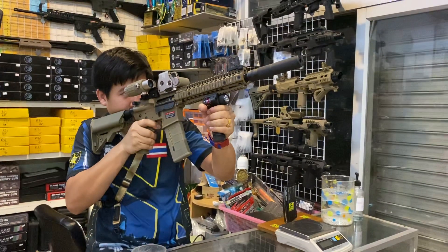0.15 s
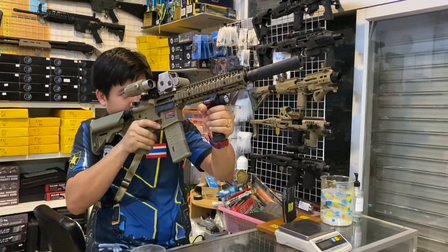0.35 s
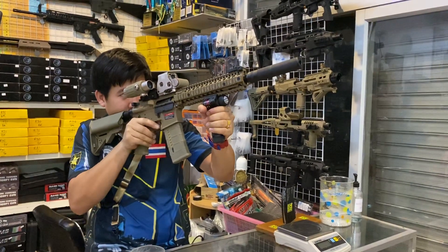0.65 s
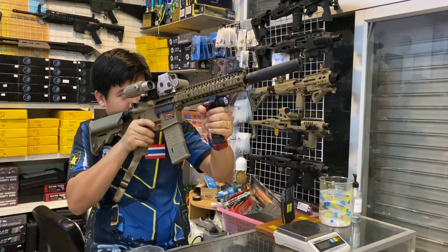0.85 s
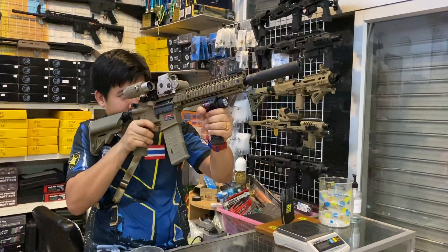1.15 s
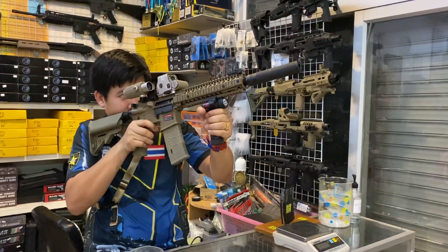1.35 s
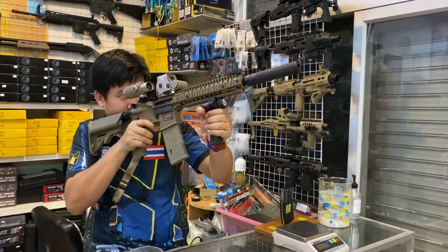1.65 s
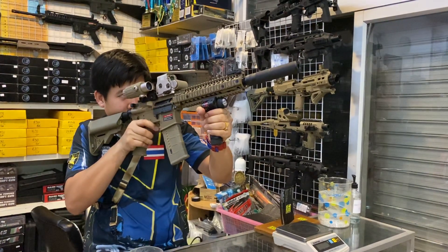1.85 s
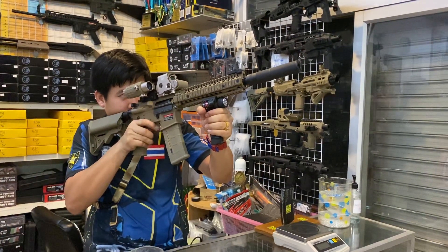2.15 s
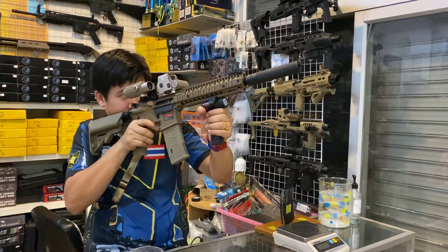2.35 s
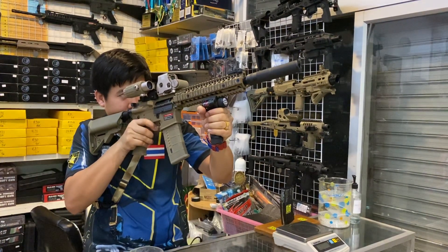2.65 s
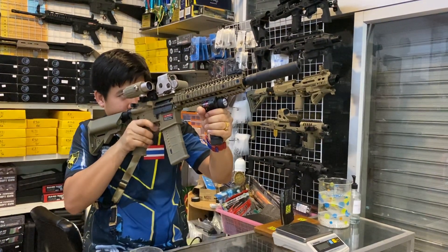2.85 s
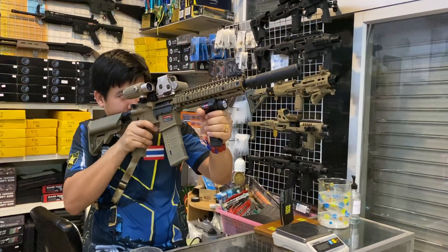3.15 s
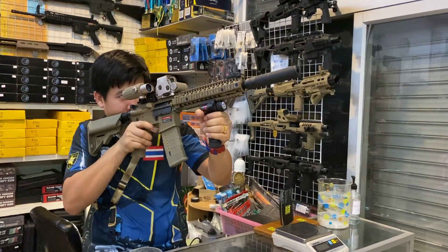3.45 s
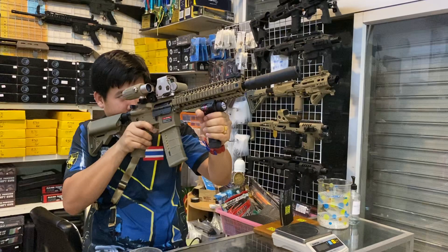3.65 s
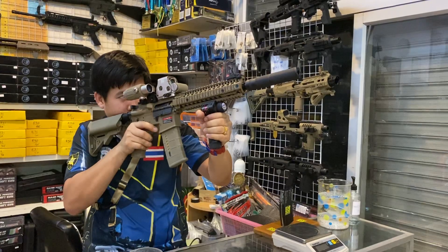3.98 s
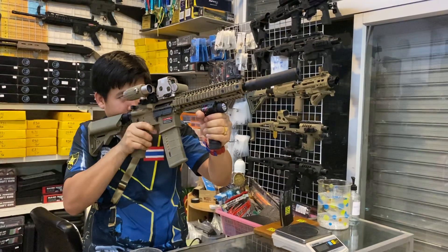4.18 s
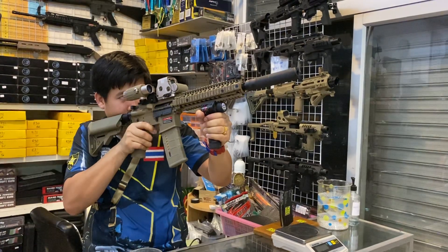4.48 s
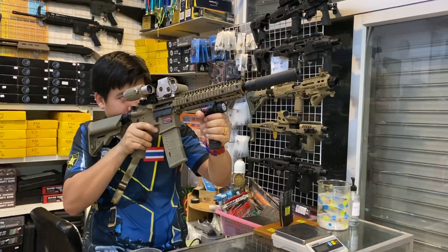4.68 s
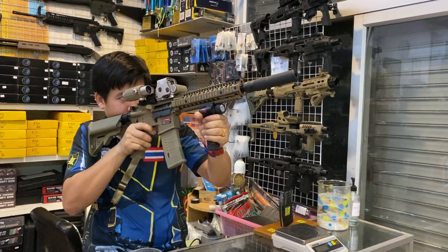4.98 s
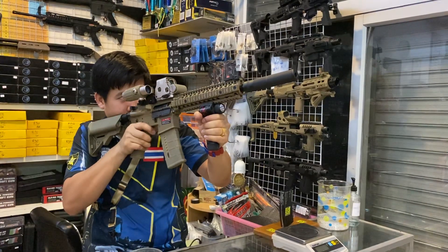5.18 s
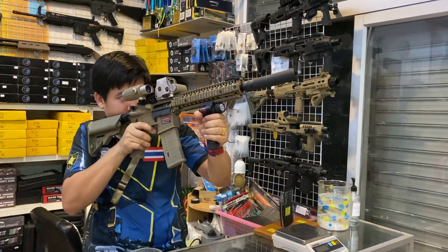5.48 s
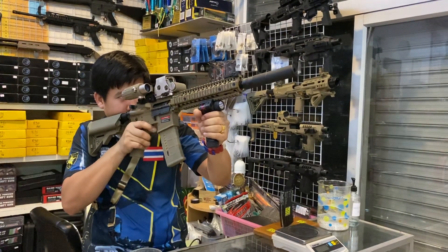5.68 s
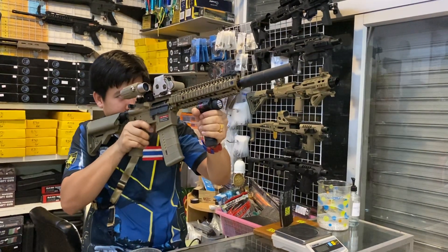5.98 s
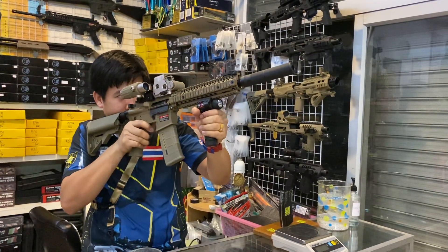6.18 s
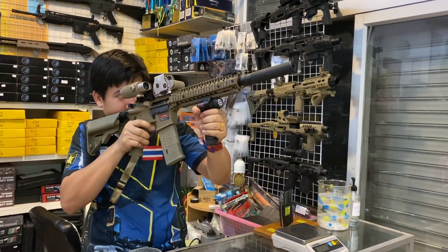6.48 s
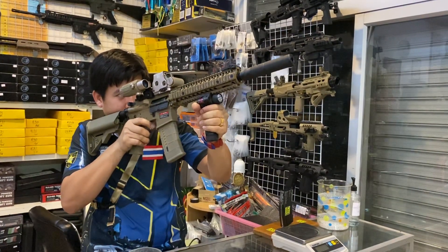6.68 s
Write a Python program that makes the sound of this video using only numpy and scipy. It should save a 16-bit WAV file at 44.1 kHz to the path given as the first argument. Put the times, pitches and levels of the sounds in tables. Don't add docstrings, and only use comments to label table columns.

```python
import sys
import numpy as np
from scipy import signal
from scipy.fft import rfft, irfft, next_fast_len
from scipy.io import wavfile
from scipy.ndimage import uniform_filter1d

SR = 44100
rng = np.random.default_rng(int(sys.argv[2]) if len(sys.argv) > 2 else 0)


def decibels_to_gain(level_db):
    exponent = np.asarray(level_db, float) / 20
    return 10 ** exponent


def master(y):
    cut = np.clip(np.atleast_2d(y).T, -1, 1)
    pcm = np.round(cut * 32767)
    wavfile.write(sys.argv[1], SR, pcm.astype(np.int16))


N = 301203


def evened(x):
    return x / np.sqrt(np.mean(x ** 2) + 1e-20)


def read(points, hz):
    f, value = np.transpose(points)
    return np.interp(np.log(hz + 1), np.log(f + 1), value)


def add(mix, s, sound):
    part = mix[max(round(s * SR), 0):][:len(sound)]
    part += sound[:len(part)]


def hiss(shape, count):
    spectrum = rfft(rng.standard_normal(count))
    gain = decibels_to_gain(read(shape, np.fft.rfftfreq(count, 1 / SR)))
    return evened(irfft(spectrum * gain, count))


def puff(shape, t, decay_s):
    fade = np.exp(-t / decay_s)
    burst = hiss(shape, len(t)) * fade
    return burst * np.linalg.norm(fade) / np.linalg.norm(burst)


def resonate(x, hz, width):
    pole = np.exp((2j * np.pi * hz - np.pi * width) / SR)
    return 2 * signal.lfilter([1 - abs(pole)], [1, -pole], x).real


def ring(modes, t, detune, rise_s):
    tones = sum(decibels_to_gain(db - 60 * t / t60) * np.sin(2 * np.pi * hz * detune * t) for hz, db, t60 in modes)
    return tones * (1 - np.exp(-t / rise_s))


# (frequency [Hz], level [dB per Hz])
ROOM_TONE = [(47, -34), (80, 0.5), (93, 9.5), (190, 0.5), (601, -16), (5770, -34), (8050, -58), (8790, -62),
             (16000, -45.5)]


def room_tone():
    return decibels_to_gain(-64.5) * np.array([hiss(ROOM_TONE, N), hiss(ROOM_TONE, N)])


# (piston lands [s], wind-up before it [s], knock [dB], crack [dB], pellet smack [dB])
SINGLES = [(0.9194, .060, -9.3, -10.6, -19), (1.1445, .0555, -13.0, -10.5, -19),
           (1.3621, .053, -10.1, -16.5, -25), (1.5542, .058, -10.0, -11.0, -19),
           (1.7451, .052, -11.5, -10.6, -20), (1.9288, .059, -9.2, -10.0, -20),
           (2.1173, .057, -12.3, -12.2, -23), (2.2991, .051, -10.6, -9.6, -23),
           (2.4893, .057, -9.4, -13.8, -23), (2.6759, .058, -8.1, -11.6, -22),
           (2.8614, .053, -10.1, -13.3, -21), (3.0552, .060, -9.0, -10.5, -19),
           (3.2353, .059, -10.6, -11.4, -13), (3.4258, .057, -9.8, -13.2, -12),
           (3.5976, .054, -10.0, -15.1, -17)]
# (first shot [s], shots [count], cycle [s], spin-up lag on the first cycle [s],
# braking lag on the last [s])
BURSTS = [
    (0.0074, 7, .04662, 0, .0034),
    (4.2303, 9, .04845, .00655, .0003),
    (5.0321, 11, .04873, .00927, .0066),
    (5.9539, 11, .04916, .00524, .0018),
    (6.85, 1, .049, 0, 0),
]
# (wind-up [s], gear [dB], knock [dB], crack [dB], thump [dB])
EFFORT = [
    (0.18, -27.5, -11, -11, -25.5),
    (.062, -26, -12, -10, -24.6),
    (.045, -28.5, -12.5, -11, -26.5),
    (0.068, -30, -12.5, -10.5, -27.5),
    (0.068, -31.5, -12, -11, -26),
]


def firing():
    rows = [(s, knock, crack, -21.7, smack) for s, _, knock, crack, smack in SINGLES]
    pulls = [(s - wind, s + 0.027, -24.5, -13.5) for s, wind, *_ in SINGLES]
    for burst, effort in zip(BURSTS, EFFORT):
        first, count, cycle, spin, brake = burst
        wind, gear_db, knock_db, crack_db, thump_db = effort
        k = np.arange(count)
        last = k == count - 1
        lag = spin * ((k > 0) + 0.13 * (k > 1))
        s = first + k * cycle + lag + brake * last
        a, b, c = np.clip(rng.standard_normal((count, 3)), -2, 2).T
        fresh = np.exp(-k / 1.2)
        knock = knock_db + 1.93 * a
        crack = crack_db + 2.7 * b - 1.5 * last
        thump = thump_db + 3.5 * fresh ** 2
        smack = -23 + 10.5 * fresh * (spin > 0) + 2.2 * c - 14.5 * last
        rows += zip(s, knock, crack, thump, smack)
        pulls.append((first - wind, s[-1] + 0.016, gear_db, -12))
    return sorted(rows), sorted(pulls)


# (frequency [Hz], width [Hz], level [dB])
GEARBOX = [(1865, 110, -4), (2470, 110, -10.5), (2850, 110, -14), (4838, 450, -13.5)]
# (frequency [Hz], level [dB per Hz])
GRIND = [(150, -26.5), (480, -16.5), (700, 4.5), (1400, 0), (2500, 0.5), (4800, -3.5), (8000, -2),
         (10500, 0), (13800, -11), (14900, -42), (16500, -60)]
# (frequency [Hz], width [Hz])
PINION = (885, 160)


def motor(pulls):
    t = np.arange(N) / SR
    level, early, whine, speed, bites = np.zeros((5, N))
    for on, off, db, whine_db in pulls:
        age = np.maximum(t - on, 0)
        run = decibels_to_gain(db) * (t > on) * np.exp(-np.maximum(t - off, 0) / 0.032)
        level += run * (0.041 + (1 - np.exp(-age / 0.032)) ** 2)
        early += run * (1 - np.exp(-age / 0.012))
        whine = np.where(t > on, decibels_to_gain(whine_db), whine)
        speed = np.where(t > on, 1 - np.exp(-(age + 0.016) / 0.027), speed)
        if on > 0:
            add(bites, on + 0.005, decibels_to_gain(db - 9.5) * puff(GRIND, t[:2000], 0.0075))

    wobble = 1 + 0.07 * uniform_filter1d(rng.standard_normal(N), 150)
    turns = np.cumsum(1080 * speed * wobble) / SR
    teeth = np.diff(np.floor(turns), prepend=0) * (1 + 0.2 * rng.standard_normal(N))
    tone = decibels_to_gain(37) * resonate(resonate(teeth, *PINION), *PINION)
    octave_hz = 2 * PINION[0]
    tone += decibels_to_gain(24.5) * resonate(resonate(teeth, octave_hz, 300), octave_hz, 300)

    chatter = decibels_to_gain(4.258 * evened(uniform_filter1d(rng.standard_normal(N), 60)))
    grind = evened(hiss(GRIND, N) * chatter)
    drive = 0.85 * evened(teeth - teeth.mean()) + rng.standard_normal(N)
    shell = evened(sum(decibels_to_gain(db) * resonate(drive, hz, width) for hz, width, db in GEARBOX))
    return level * (grind + whine * tone) + decibels_to_gain(4) * early * whine * shell + bites


# (frequency [Hz], level [dB], t60 [s])
KNOCK = [(1280, 0, .009), (680, -14, .03), (850, -12, .014)]
# (frequency [Hz], level [dB], t60 [s])
TUBE = [(1200, -3.5, .021), (1390, -4.5, .024), (1025, -9, .04), (3900, -16, .012)]
# (frequency [Hz], level [dB], t60 [s])
THUMP = [(190.5, -1.5, 0.043), (150.2, 0.5, 0.029), (132, -2, 0.07), (276, -15.5, 0.11), (328, -20, 0.21),
         (521, -18.5, 0.21)]
# (frequency [Hz], level [dB], t60 [s])
BOOM = [(57.4, -15.5, 0.067), (82, -4.5, 0.07)]
# (frequency [Hz], level [dB])
CRACK = [(900, -37.5), (2200, -0.5), (3500, 1), (4900, 5.5), (8000, -4), (11000, 1), (13800, 1),
         (14900, -14.5), (16500, -38)]
# (frequency [Hz], level [dB])
SMACK = [(400, -62), (1200, -6), (2500, -5.5), (5500, -1), (8000, -3), (11000, -3), (13800, -8),
         (14900, -22.5), (16500, -36.5)]


def shots(fired):
    tube_s, thump_s, flight_s = 0.00515, 0.0043, 0.0207
    out, air, knocks = np.zeros((3, N))
    t = np.arange(6000) / SR
    chance = rng.standard_normal((len(fired), 4))
    spike = np.sinc((t - 0.0003) * 24000) - 0.3 * np.sinc((t - 0.0003) * 5400)
    for (s, knock_db, crack_db, thump_db, smack_db), (a, b, c, d) in zip(fired, chance):
        add(knocks, s - 0.00016, decibels_to_gain(knock_db + 3) * ring(KNOCK, t, 1 + 0.02 * a, 0.00008))
        add(out, s - 0.0003, decibels_to_gain(crack_db + 0.5) * spike)
        add(out, s - 0.0001, decibels_to_gain(crack_db + 3) * puff(CRACK, t, 0.0006))
        add(out, s + tube_s, -decibels_to_gain(knock_db - 1 + b) * ring(TUBE, t, 1 + 0.006 * c, 0.0004))
        add(out, s + tube_s, decibels_to_gain(crack_db - 11 + c) * puff(CRACK, t, 0.006))
        add(air, s + thump_s, -decibels_to_gain(thump_db + 5) * ring(THUMP, t, 1 + 0.005 * d, 0.0008))
        boom_db = thump_db - 34.5 + 5.2 * a
        add(out, s + thump_s, decibels_to_gain(boom_db) * ring(BOOM, t, 1 + 0.064 * b, 0.0098))
        add(out, s + flight_s, decibels_to_gain(smack_db + 0.7) * puff(SMACK, t, 0.0059))

    small = signal.butter(2, 105, "high", fs=SR, output="sos")
    thin = signal.butter(2, 480, "high", fs=SR, output="sos")
    null = signal.iirnotch(99, 3.0, SR)
    air = signal.lfilter(*null, signal.sosfilt(small, air))
    return out + air + decibels_to_gain(-1.13) * signal.sosfilt(thin, knocks)


# (frequency [Hz], t60 [s])
SHOP = [(60, 0.19), (150, 0.26), (400, 0.2474), (1500, 0.33), (5000, 0.26), (13000, 0.22)]
# (frequency [Hz], level [dB])
WET = [(60, -1.5), (200, -2.5), (480, 11), (800, 2), (2000, 6), (6000, 5), (13500, 2.5), (14800, -1.5),
       (16000, -27)]
# (left delay [s], right delay [s], level [dB])
EARLY = [
    (.0023, 0.0024, -9),
    (.0094, 0.0053, -22.5),
    (0.0162, 0.0135, -29.5),
    (0.0187, 0.014, -51),
    (0.0237, 0.0182, -18.5),
]


def shop(x):
    taps = np.zeros((6, SR))
    at = np.arange(400, SR - 20, 20) + rng.integers(0, 20, (6, (SR - 401) // 20))
    np.put_along_axis(taps, at, rng.choice([-1., 1.], at.shape), 1)
    hz, t, z = signal.stft(taps, SR, nperseg=512)
    fall_db = -60 * t / read(SHOP, hz)[:, None]
    z = z * np.hypot(decibels_to_gain(fall_db), decibels_to_gain(-5 + fall_db / 1.716))
    z = z / np.sqrt((abs(z) ** 2).sum(2, keepdims=True)) * decibels_to_gain(read(WET, hz)[:, None])
    tail = signal.istft(z, SR, nperseg=512)[1]
    tail = decibels_to_gain(-8.0) * tail / np.linalg.norm(tail[0])

    phase = 2 * np.pi * (2.3 * np.arange(N) / SR + np.arange(3)[:, None] / 3)
    steady = signal.butter(2, 1600, fs=SR, output="sos")
    low = signal.sosfiltfilt(steady, x)
    turns = np.sqrt(2 / 3) * np.cos(phase) * (x - low) + low * [[1], [0], [0]]
    turns = np.repeat(turns, 2, axis=0)
    out = signal.fftconvolve(turns, tail, axes=1)[:, :N].reshape(3, 2, N).sum(0)

    dull = uniform_filter1d(x, 5) - uniform_filter1d(x, 100)
    for left_s, right_s, db in EARLY:
        add(out[0], left_s, decibels_to_gain(db) * dull)
        add(out[1], right_s, decibels_to_gain(db) * dull)
    return out


# (time [s], level [dB])
DRONE = [
    (0, -58),
    (3.5, -65.5),
    (4.0, -63),
    (4.8, -53.5),
    (5.4, -65.5),
    (6.83, -73.5),
]


def rumble(fired):
    shake_db, scatter_db, t60_s, rise_s = -41, 2.5, 0.18, 0.01
    t, power = np.arange(SR // 2) / SR, np.zeros(N)
    for (s, *_), a in zip(fired, rng.standard_normal(len(fired))):
        fall = decibels_to_gain(2 * (shake_db + scatter_db * a - 60 * t / t60_s))
        add(power, s, fall * (1 - np.exp(-t / rise_s)))
    heave = hiss([(30, -21), (45, -1.5), (62, 6.0), (84, -4.5), (100, -36.5)], N)
    shape = [(25, -28.5), (40, -9.0), (48, 1.5), (60, -14.0), (95, -53)]
    drone = np.array([hiss(shape, N), hiss(shape, N)])
    drone_db = np.interp(np.arange(N) / SR, *np.transpose(DRONE))
    return np.sqrt(power) * heave + decibels_to_gain(drone_db) * drone


# (time [s], peak level [dB], treble [dB], ring t60 [s])
TICKS = [
    (0.5564, -50, 6.5, 0.031),
    (0.5896, -53, 8, 0.078),
    (0.654, -49.5, 13.5, 0.11),
    (0.727, -53, -22, 0.069),
    (0.7698, -60.5, -5, 0.18),
    (3.9471, -32.5, 13, 0.018),
    (4.127, -86, -36.5, 0.11),
    (6.638, -52, -17, 0.083),
    (6.7506, -65, 9, 0.0316),
]
# (time [s], level [dB])
STIR = [
    [(0.5, -56), (0.588, -54), (0.622, -60.5), (0.746, -54), (0.842, -64.5), (0.85, -88)],
    [(6.62, -78), (6.646, -74), (6.726, -87.5), (6.77, -50.5), (6.775, -82)],
]


def handling():
    out, t = np.zeros(N), np.arange(6000) / SR
    for s, db, treble_db, t60 in TICKS:
        top_db = 2 * treble_db
        shape = [(600, -2.5), (1500, 11.5), (4000, 19), (8000, top_db), (13000, top_db - 3.5)]
        add(out, s, decibels_to_gain(db + 0.5 - 60 * t / max(t60, 0.01)) * hiss(shape, len(t)))
    for rows in STIR:
        s, db = np.transpose(rows)
        t = np.arange(s[0], s[-1], 1 / SR)
        cloth = hiss([(200, 8.5), (700, 15.5), (2500, 13), (6000, -50.0), (12000, -41)], len(t))
        level = decibels_to_gain(np.interp(t, s, db) - 5.5)
        add(out, s[0], level * cloth * signal.windows.tukey(len(t), 0.2))
    return out


# (frequency [Hz], likeness [0-1])
SAME = [(30, 0.6), (70, 0.71), (150, 1), (300, 0.06), (600, 0.09), (1500, 0.14), (5000, 0.17), (7500, 0.4),
        (15000, 0.9998)]
# (frequency [Hz], lead [radians])
LEAD = [(0, 0), (1380, 1.08), (3010, 0.5), (6800, 1.2), (8100, -2), (9730, -7), (10700, -7.5),
        (12700, -10.5), (13400, -12), (14600, -11), (15300, -19.5), (16100, -20.5)]
# (frequency [Hz], left minus right [dB])
TILT = [(60, 0), (600, -1), (1200, -1), (2400, 2), (5500, 4.5), (7800, 0.42), (15000, -1)]


def ports(direct, far):
    size = next_fast_len(N)
    hz = np.fft.rfftfreq(size, 1 / SR)
    same = np.clip(read(SAME, hz), 0, 1)
    half_db = read(TILT, hz) / 2
    near, (a, b) = rfft(direct, size), rfft(far, size)
    left = (near + a) * decibels_to_gain(half_db)
    right = (near + same * a + np.sqrt(1 - same ** 2) * b) * decibels_to_gain(-half_db)
    right = right * np.exp(-1j * np.interp(hz, *np.transpose(LEAD)))
    return irfft(np.array([left, right]), size)[:, :N]


def scene():
    fired, pulls = firing()
    rifle = motor(pulls) + shots(fired) + handling()
    return ports(rifle, shop(rifle) + room_tone() + rumble(fired))


def top_cut(x):
    return signal.sosfilt(signal.butter(12, 16510, fs=SR, output="sos"), x)


def record(dry):
    bass_cut = signal.butter(2, 45, "high", fs=SR, output="sos")
    held = np.clip(signal.sosfilt(bass_cut, dry), -1, 1)
    edge = signal.firwin(255, 16450, window=("kaiser", 8), fs=SR)
    mix = signal.oaconvolve(held, edge[None], "same")
    return top_cut(mix)


dry = scene()
out = record(dry)
master(out)
```